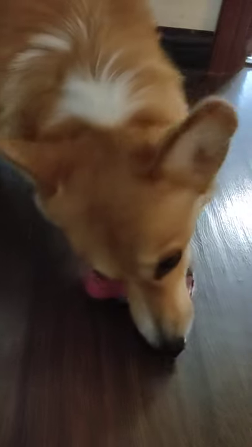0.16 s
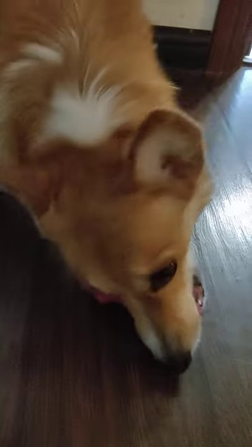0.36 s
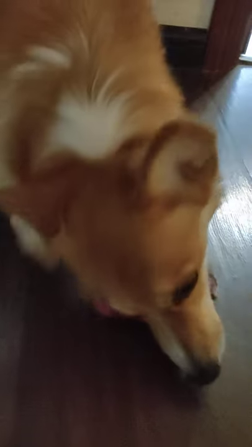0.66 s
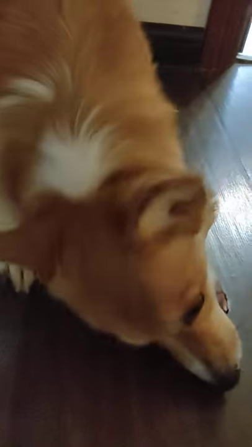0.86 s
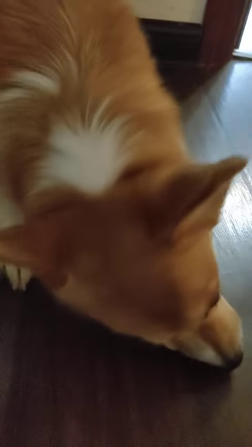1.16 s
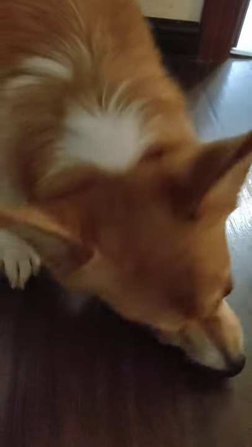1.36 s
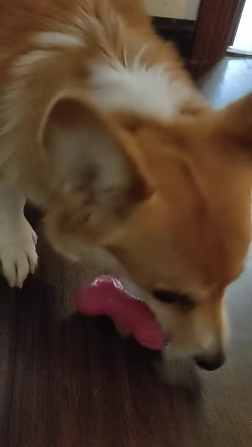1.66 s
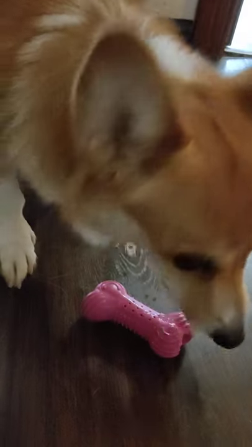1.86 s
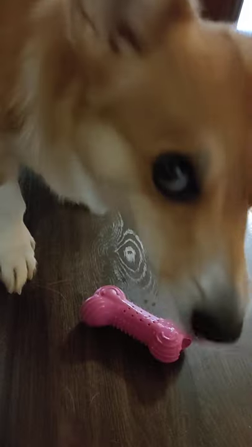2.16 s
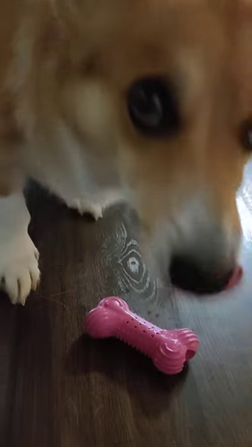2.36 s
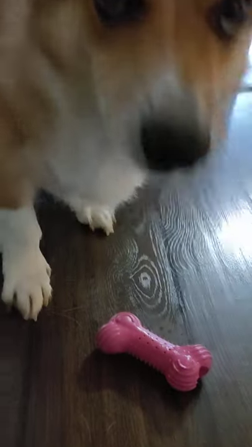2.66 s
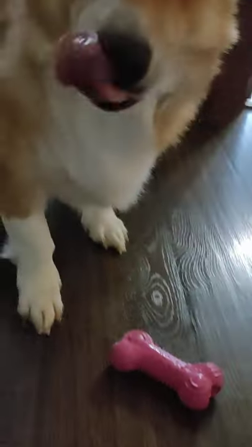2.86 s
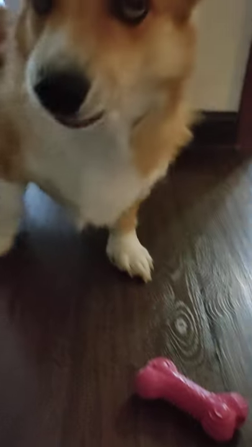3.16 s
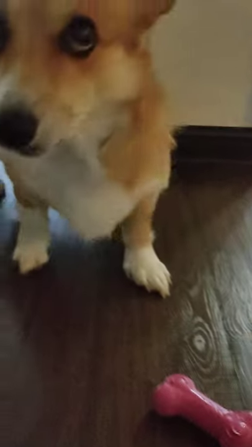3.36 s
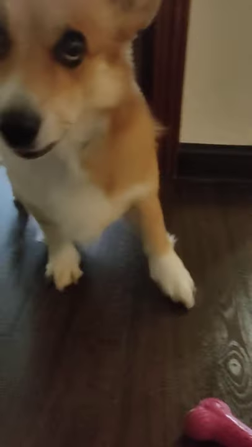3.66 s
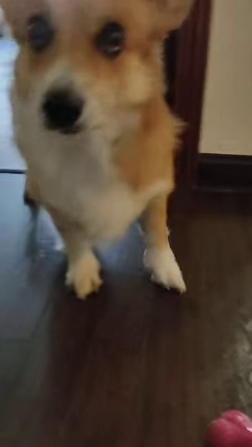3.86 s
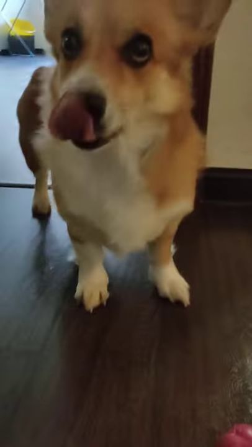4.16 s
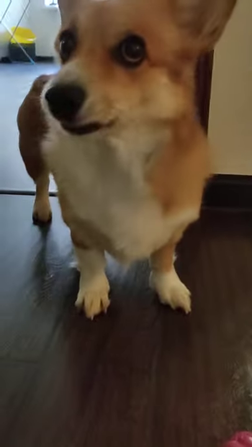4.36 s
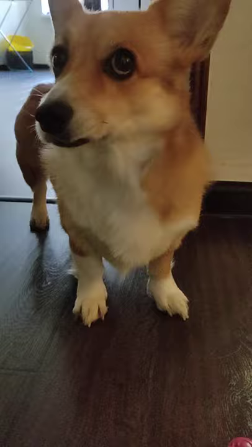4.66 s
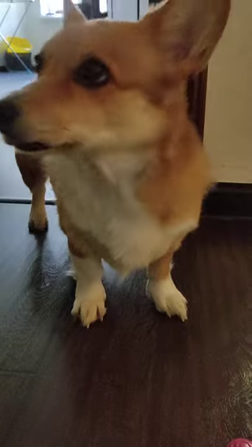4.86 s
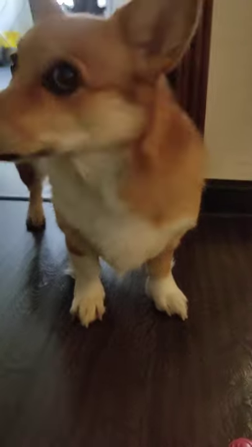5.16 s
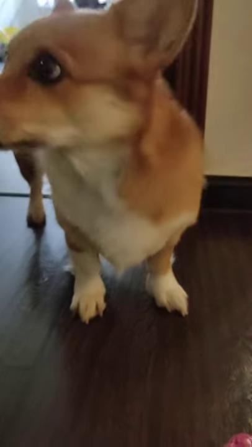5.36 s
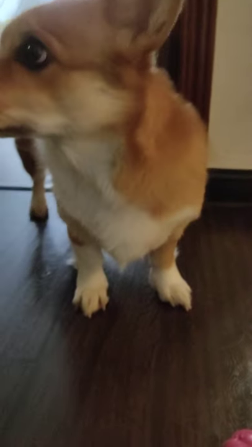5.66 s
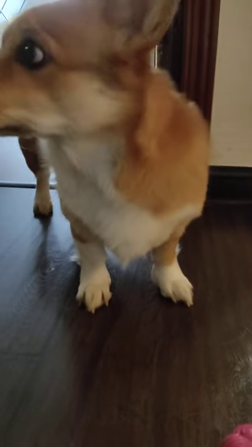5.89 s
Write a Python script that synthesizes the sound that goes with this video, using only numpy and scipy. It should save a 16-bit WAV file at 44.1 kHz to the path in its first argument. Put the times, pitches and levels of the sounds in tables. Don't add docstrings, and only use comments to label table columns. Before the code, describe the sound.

A quiet bare room with a wooden floor, heard close on a phone with faint hiss and a barely audible distant motor whine. From 0 to 0.5 s, soft nose puffs and low rubbing. At 0.6-0.7 s claws tick and scrape, then at about 0.85 s a very loud, hard, bright clatter rings off the walls. A soft huff comes at 1.1 s and a tiny wet smack at 1.4 s. Rubber rubs the boards from 1.5 s, low rumble swells, and the toy thuds at 1.88 s. Light scattered ticks and rustle run from 2.3 to 2.9 s. Scratchy claw steps fall at 3.05, 3.4 and 3.7 s, then a denser scrape and clicks at 3.8-4.03 s. Small wet licks cluster around 4.15 s, with fainter ones to 4.8 s. A soft bump at 5.03 s, then fading rub and near silence to 6 s.

```python
import sys
import numpy as np
from scipy import signal
from scipy.fft import rfft, irfft, next_fast_len
from scipy.io import wavfile
from scipy.ndimage import uniform_filter1d, map_coordinates

SR = 44100
rng = np.random.default_rng(int(sys.argv[2]) if len(sys.argv) > 2 else 0)


def natural_amplitude(level_db):
    exponent = np.asarray(level_db, float) / 20
    return 10 ** exponent


def output_pcm(signal):
    pcm = np.clip(np.atleast_2d(signal).T, -1, 1) * 32767
    wavfile.write(sys.argv[1], SR, np.round(pcm).astype(np.int16))


N = 265923
TIME = np.arange(N) / SR

# frequency in Hz, level in dB.
CLAW_BODY = [(1000, -19), (2200, 5.5), (3300, 11), (4500, 13), (6000, 5.5), (9000, -55.5)]


def unit(x):
    return x / np.sqrt(np.mean(x ** 2) + 1e-20)


def along(points, hz):
    f, v = np.transpose(points)
    return np.interp(np.log(hz + 1), np.log(f + 1), v)


def filtered(x, response):
    size = next_fast_len(N + SR // 2)
    hz = np.fft.rfftfreq(size, 1 / SR)
    return irfft(rfft(x, size) * response(hz), size)[..., :N]


def coloured(points):
    return lambda hz: natural_amplitude(along(points, hz))


def modes(table):
    def response(f):
        total = 0
        for k, (centre, width, db) in enumerate(table):
            damping = 1j * f * width
            total = total + (-1) ** k * natural_amplitude(db) * damping / (centre * centre - f * f + damping)
        return total
    return response


def causal(points):
    cepstrum = irfft(np.log(natural_amplitude(along(points, np.fft.rfftfreq(1024, 1 / SR)))))
    cepstrum[1:512] *= 2
    cepstrum[513:] = 0
    pulse = irfft(np.exp(rfft(cepstrum)))[:512]
    return pulse / np.linalg.norm(pulse)


def paired(response, grain_db=0):
    # frequency in Hz, share from 0 to 1.
    likeness = [(100, .97), (500, 0.65), (1200, 0.02), (3000, 0.2)]
    grit = natural_amplitude(grain_db * unit(uniform_filter1d(rng.standard_normal(N), size=60)))

    def mid_side(hz):
        turn = np.arccos(np.clip(along(likeness, hz), 0, 1)) / 2
        return response(hz) * [np.cos(turn), np.sin(turn)]

    mid, side = filtered(grit * rng.standard_normal((2, N)), mid_side)
    return unit(np.array([mid + side, mid - side]))


def swells(rows, uneven_db, rate):
    start, end, rise, fall, db = np.transpose(rows)[..., None]
    before = np.clip((start - TIME) / np.abs(rise), 0, None)
    after = np.clip((TIME - end) / np.abs(fall), 0, None)
    loss_db = 18.5 * (before + after) ** 1.16
    unsteady = map_coordinates(rng.standard_normal(int(N * rate / SR) + 4), [TIME * rate])
    return np.sqrt(np.sum(natural_amplitude(db - loss_db) ** 2, axis=0)) * natural_amplitude(uneven_db * unsteady)


def quiet():
    # frequency in Hz, level in dB.
    air_spectrum = [(2.9, 6), (5.0, -8), (18, -9), (32, -13), (411, -33.5), (442, -32), (500, -35.5),
                    (566, -36), (1020, -36), (1240, -39), (1800, -48.5), (2340, -66), (3960, -120)]
    # frequency in Hz, rms level in dB.
    motor = [(1136, -90.5), (1233, -84.5), (1281, -87), (1335, -91)]
    noise = rng.standard_normal((2, N))
    air = filtered(noise, lambda hz: natural_amplitude(along(air_spectrum, hz)) * (hz < 2200))
    whine = np.zeros((2, N))
    for (hz, db), phase in zip(motor, rng.uniform(0, 1.5, (len(motor), 2, 1))):
        whine += natural_amplitude(db + 5.5) * np.sin(2 * np.pi * hz * TIME + phase)
    return natural_amplitude(-52.5) * unit(air) * natural_amplitude([[.8], [-.8]]) + whine


def huffs():
    # start in seconds, length in seconds, level in dB.
    puffs = [(0.01, 0.037, -68.5), (0.381, 0.06, -67), (0.459, 0.045, -58.5), (0.641, 0.049, -68),
             (1.088, 0.074, -56), (1.368, 0.059, -69.5), (1.748, 0.13, -67.5), (2.446, 0.11, -70.5),
             (3.037, 0.036, -64), (3.434, 0.13, -72.5), (3.816, 0.046, -65), (4.002, 0.0099, -71.5),
             (4.145, 0.025, -63.5), (4.264, 0.027, -72)]
    # frequency in Hz, level in dB.
    nose = [(200, -3.5), (400, 0.5), (700, 4.5), (1300, 3.5), (1900, -6), (2600, -8.5), (5000, -33)]
    rise_s, fall_s = 0.04, 0.041
    gestures = [(s, s + length, rise_s, fall_s, db) for s, length, db in puffs]
    flow = swells(gestures, uneven_db=3.0, rate=28)
    return flow * paired(coloured(nose), grain_db=-3.0) * natural_amplitude(6.5)


def contacts():
    # time in seconds, peak in dB, claw body in dB,
    # knock in the board in dB, left-right in dB.
    strikes = [(0.582, -32, 0, -26.5, 4), (0.6461, -28, 2, -19, -13.5), (0.6495, -32.5, 0.5, -32, -3),
               (0.652, -32, -2.5, -31, -6.5), (0.666, -25, -21, -48, -21), (0.6688, -43, -8, -40, -0.5),
               (0.6874, -18, -6.5, -46.5, -8), (0.6887, -26, -1, -47.5, -9), (0.8433, -0.5, -17, -33.5, -2),
               (0.8453, -11, -22, -29.5, -7.5), (0.8477, -7.5, -8, -42.5, 13.5),
               (0.848, -21, -16.5, -41, 0), (0.8524, -11, -10.5, -35, -0.5), (0.8507, -7, -15.5, -44, -16),
               (0.8661, -3.5, -10, -30.5, -21), (0.8696, -13.5, -11, -39.5, -20.5),
               (0.8716, -21, -17, -32.5, -10), (1.8796, -24.5, -20, -23, -1), (3.0317, -39, -14.5, -22, 17),
               (3.0362, -29, -11, -23.5, 21), (3.043, -24.5, -27, -30.5, 26), (3.0617, -24, -29, -26, -4),
               (3.3412, -27, 0.5, -20, -23.5), (3.3706, -31.5, 1.5, -7.5, -2), (3.3968, -38, 1.5, -27, 4.5),
               (3.3974, -10, -19, -30.5, -24), (3.399, -17, -1, -22.5, 3), (3.6785, -17.5, -27, -32.5, 0.5),
               (3.9553, -19, -13, -29.5, -12), (3.9602, -15, -6.5, -32, 0), (3.9723, -20.5, -12, -25, 2),
               (3.9859, -7.5, -18.5, -38, -12), (4.0329, -26.5, -1.5, -16, -11)]
    # time in seconds, peak in dB, claw body in dB,
    # left-right in dB.
    ticks = [(0.0363, -46, -8, 27.5), (0.5913, -39, -7, 1), (0.6043, -41.5, -8, 4.5),
             (0.6354, -38, -5, 10.5), (1.64, -50, -33, 31), (2.0353, -44, -11, 19), (2.2573, -45, -25, -5),
             (2.2962, -35, -38, 9), (2.3107, -40, -30, -2.5), (2.4297, -49, -26, 21), (2.438, -34, -28, 5),
             (2.4458, -34, -25, 29), (2.4654, -42, -16, 22), (2.4728, -32, -20, 5), (2.5024, -36, -18, -17),
             (2.5177, -46, -20, -15), (2.5458, -55, -22, 25), (2.5664, -30, -21, 0),
             (2.6003, -39.5, -6, 11.5), (2.7826, -41, -32, 20), (2.8145, -39.5, -26, 13),
             (2.8496, -32.5, -26, -2), (2.965, -33, -21, 13.5), (3.0571, -49, -13.5, 8.5),
             (3.0598, -27, -8, 6), (3.0651, -33, -30, -18), (3.075, -38.5, -18, 20.5),
             (3.1754, -45, -11, -2), (3.214, -39, -18.5, -10), (3.2203, -34, -20, -30),
             (3.4798, -32.5, -24, -18), (3.5043, -30.5, -1.5, 4.5), (3.8048, -36.5, -16, 1),
             (3.8193, -25, -14, 0), (3.847, -38, -8.5, -1), (3.877, -21.5, -16, -16),
             (3.9801, -30.5, -11.5, -7), (4.0169, -35, -16, -15), (4.0044, -41, -18, 0.5),
             (4.136, -25.5, -52, 11), (4.1474, -52, -18, 5), (4.1683, -41, -37, -18.5),
             (4.6212, -43.5, -29, -8.5), (4.7385, -46.5, -4, -10), (4.7722, -34.5, -17, -9),
             (4.9187, -50, -29.5, 23.5)]
    # time in seconds, peak in dB,
    # claw body in dB, knock in the board in dB.
    taps = [(0.6736, -36, -12, -35), (1.4006, -54, 7.5, 1.5), (1.5003, -59, 8, -8),
            (2.1014, -54, -9.5, -6.5), (2.1854, -61.5, 5, -1), (2.4877, -55, 1, -1), (2.4946, -57, 7, -11),
            (2.5115, -56, -11, -8), (2.5244, -52, -18, -4), (3.3601, -45, 16, 1), (3.5544, -35, -5, -19),
            (3.5574, -36, -10, -22), (3.7361, -37.5, -4, -17), (4.2554, -56.5, -21, -18.5),
            (4.2742, -41.5, -22.5, -33), (4.4264, -49.5, -8.5, -19), (4.5644, -52.5, -21, -14),
            (5.0266, -46.5, -18, -16)]
    strike_ms, tick_ms, tap_ms = 12, 9, 9
    tick_knock_db, tap_pan_db = -30.5, 5
    rows = [(*row, strike_ms) for row in strikes]
    rows += [(s, db, body, tick_knock_db, pan, tick_ms) for s, db, body, pan in ticks]
    rows += [(*row, tap_pan_db, tap_ms) for row in taps]
    return rows


def claws():
    # frequency in Hz, level in dB.
    tip = [(3000, -37), (6000, 8.5), (9000, 5.5), (12500, -3.5), (14500, -12)]
    knock = [(250, -33), (600, -0.5), (1200, -7), (2000, -0.5), (4000, -25.5)]
    crack = [12, 7, 7]
    linger = [1, 1.9, 1.6]
    # delay in ms, level in dB.
    walls = [(14.4, -25.5), (18.6, -26.5), (20.6, -27.5)]
    rows = contacts()
    layers = np.zeros((3, 2, N + 1500))
    t = np.arange(1500) / SR
    chance = rng.standard_normal((len(rows), 3, 1500))
    for (s, db, body_db, knock_db, pan_db, ms), (both, left, right) in zip(rows, chance):
        decay_s = ms * np.reshape(linger, (3, 1, 1)) / 1000
        fall = natural_amplitude(-60 * t / decay_s) + .04 * natural_amplitude(-60 * t / .03)
        burst = (both + 2.0 * np.array([left, right])) * fall
        burst[..., 0] = np.reshape(crack, (3, 1))
        burst *= 4 / np.linalg.norm(burst, axis=(1, 2), keepdims=True)
        side = natural_amplitude(pan_db * np.outer([.25, .08, .05], [1, -1]))[..., None]
        level = natural_amplitude(db + np.array([-9, body_db + 2.5, knock_db + 13.5]))[:, None, None]
        at = round((s + .0004) * SR)
        layers[:, :, at:at + 1500] += level * side * burst
    shapes = np.array([causal(tip), causal(CLAW_BODY), causal(knock)])[:, None]
    left, right = signal.fftconvolve(layers, shapes, axes=2).sum(0)[:, :N]
    direct = np.array([left, np.roll(right, shift=15)])
    heard = direct.copy()
    for k, (ms, db) in enumerate(walls):
        facing = direct[::(-1) ** k]
        heard += natural_amplitude(db) * np.roll(facing, round(ms * SR / 1000), axis=1)
    return heard


def dragging():
    # peak in seconds, rise in seconds, fall in seconds, joist rumble in dB,
    # board rub in dB.
    drags = [(0.25, 0.41, 0.52, -61, -64), (0.5, 0.12, 0.45, -66, -72), (0.85, 0.13, 0.29, -56.5, -60.5),
             (1.1, 0.34, 0.73, -68.5, -80), (1.43, 0.029, 0.13, -53, -79), (1.545, 0.011, 0.23, -61, -46.5),
             (1.66, 0.18, 0.2, -48, -74), (1.791, 0.42, 0.13, -42, -56), (1.95, 0.2, 0.3, -45.5, -55),
             (2.299, 0.12, 0.06, -55, -71), (2.45, 0.065, 0.36, -55.5, -60), (2.64, 0.2, 0.35, -51, -67.5),
             (2.93, 0.63, 0.25, -59, -72), (3.22, 0.2, 0.49, -55, -61.5), (3.71, 0.045, 1, -60.5, -70),
             (4.26, 0.11, 0.077, -78.5, -66.5), (4.43, 0.028, 0.07, -59.5, -62.5),
             (4.54, 0.087, .06, -57.5, -70), (4.75, 0.27, 0.55, -65, -70), (5.07, .04, 0.26, -58.5, -67),
             (5.3, 0.11, 0.55, -62.5, -72.5)]
    # frequency in Hz, width in Hz, level in dB.
    hollow = [(75, 27, -2.5), (134.5, 21, 0), (164.7, 24, -6.5)]
    rubbed = [(223, 47, 3.5), (325, 53, 1.5), (405, 39, -4.5)]
    rumble_rows = [(s, s, up, down, db) for s, up, down, db, _ in drags]
    rub_rows = [(s, s, up, down, db) for s, up, down, _, db in drags]
    rumble = swells(rumble_rows, uneven_db=1.5, rate=5.5) * paired(modes(hollow), grain_db=2.0)
    rub = swells(rub_rows, uneven_db=3.0, rate=25) * paired(modes(rubbed), grain_db=4.0)
    return rumble * natural_amplitude(-3.5) + rub * natural_amplitude(-1.1)


def sliding():
    # peak in seconds, rise in seconds, fall in seconds, rustle in dB,
    # claw drag in dB.
    slides = [(0.27, .2, 0.095, -62.5, -74), (0.5, 0.17, 0.19, -62, -66), (0.6, .015, 0.069, -51, -52),
              (0.681, 0.1, 0.021, -46.5, -47), (0.81, 0.12, .05, -73.5, -79.5),
              (1.339, 0.064, 0.061, -59.5, -81), (1.65, 0.14, 0.33, -62, -93),
              (2.297, 0.13, 0.4, -62, -73.5), (2.446, 0.012, 0.038, -49, -57),
              (2.475, 0.04, 0.067, -50.5, -58), (2.51, 0.05, 0.19, -57, -71),
              (3.039, 0.015, 0.052, -45, -50), (3.066, 0.049, 0.021, -35.5, -38.5),
              (3.2, 0.16, .04, -60, -73), (3.425, 0.023, 0.065, -70, -49), (3.46, 0.015, 0.078, -46, -46),
              (3.665, 0.16, 0.037, -55.5, -67), (3.73, 0.12, 0.16, -54, -58.5),
              (3.806, 0.008, 0.16, -54, -56), (3.821, 0.016, 0.064, -41.5, -55),
              (3.84, .04, 0.069, -52, -42), (3.855, 0.053, 0.038, -35.5, -43),
              (3.874, 0.05, 0.027, -40, -42.5), (3.945, .12, 0.041, -48, -49),
              (4.0, .02, 0.055, -61, -53.5), (4.155, 0.029, 0.031, -49.5, -76),
              (4.29, 0.055, 0.22, -58, -75), (5.114, .08, 0.046, -64.5, -73)]
    # frequency in Hz, level in dB.
    fur = [(4000, -31.5), (7000, 4), (9500, -1), (12000, -3.5), (14500, -4)]
    rustle_rows = [(s, s, up, down, db) for s, up, down, db, _ in slides]
    scrape_rows = [(s, s, up, down, db) for s, up, down, _, db in slides]
    rustle = swells(rustle_rows, uneven_db=1.8, rate=29) * paired(coloured(fur), grain_db=3.0)
    scrape = swells(scrape_rows, uneven_db=2.2, rate=60) * paired(coloured(CLAW_BODY), grain_db=4.5)
    return rustle * natural_amplitude(-7) + scrape * natural_amplitude(-1.5)


def smacks():
    # time in seconds, peak in
    # dB, frequency in Hz, t60 in ms.
    licks = [(1.4006, -38.5, 2940, 10.6), (1.415, -55, 2800, 16), (2.102, -54, 2320, 9.3),
             (2.5245, -44, 885, 8.6), (4.114, -58, 820, 22), (4.134, -48.5, 810, 25),
             (4.146, -46.5, 1440, 25), (4.166, -45.5, 810, 15), (4.168, -50.5, 1250, 28),
             (4.18, -62, 800, 16), (4.255, -50, 780, 24), (4.275, -51, 750, 19), (4.426, -58.5, 843, 17),
             (4.739, -59, 2330, 7.2), (4.774, -52, 2620, 11)]
    glide, rise_s = 6.5, 0.00021
    out = np.zeros((2, N + 1500))
    t = np.arange(1500) / SR
    for (s, db, hz, ms), turn in zip(licks, rng.standard_normal((len(licks), 2, 1))):
        shape = natural_amplitude(db - 60 * t / (abs(ms) / 1000)) * (1 - np.exp(-t / rise_s))
        tone = np.sin(2 * np.pi * hz * t * (1 + glide * t) + 1.06 * turn)
        out[:, round(s * SR):][:, :1500] += 1.67 * shape * tone
    return out[:, :N]


def thuds():
    # time in seconds, peak in dB, softness in ms.
    blows = [
        (1.538, -47.5, 0.44),
        (1.8787, -17.5, 0.62),
        (4.424, -56.5, 0.27),
        (5.0258, -45.5, 1.44),
    ]
    # frequency in Hz, width in Hz, level in dB.
    board = [(263, 34, 3.5), (151, 42, -10), (454, 20, 5.5), (696, 370, -6)]
    push = np.zeros(N)
    for s, db, ms in blows:
        u = (np.arange(220) - 110) / (ms * SR / 1000)
        push[round(s * SR):][:220] += natural_amplitude(db) * (1 - u * u) * np.exp(-u * u / 2)
    ring = .45 * filtered(push, modes(board))
    return (1.25 * push + ring) * natural_amplitude([[1.2], [-1.2]])


def room(x):
    # frequency in Hz, t60 in seconds.
    decay = [(150, 0.33), (500, 0.46), (2000, 1), (5000, 0.7), (9000, 0.51), (12500, 0.27), (14500, 0.25)]
    wet, step = np.zeros((2, N + 2 * SR)), SR // 4
    delay = round(.0125 * SR)
    for at in range(0, N, step):
        hz, t, z = signal.stft(rng.standard_normal((2, SR * 3 // 5)), SR, nperseg=256)
        fading = z * natural_amplitude(-60 * t / along(decay, hz)[:, None])
        tail = signal.istft(fading, SR, nperseg=256)[1]
        tail[1] = signal.lfilter([.07], [1, -.93], tail[0] - tail[1]) + tail[1]
        part = signal.fftconvolve(x[:, at:at + step], tail / np.linalg.norm(tail[0]), axes=1)
        wet[:, at + delay:][:, :part.shape[1]] += part
    return wet[:, :N]


def scene():
    background = quiet()
    ticks, blows, mouth = claws(), thuds(), smacks()
    moves = huffs() + dragging() + sliding()
    sent = natural_amplitude(-13.0) * mouth + natural_amplitude(-10.5) * ticks + natural_amplitude(-8.5) * blows + natural_amplitude(-11.0) * moves
    return ticks + blows + moves + mouth + room(sent) + background


def roll_off(x):
    return signal.sosfilt(signal.butter(12, 16430, fs=SR, output="sos"), x)


def record(dry):
    # frequency in Hz, width in Hz, level in dB.
    port_modes = [(11470, 915, 21.3), (9115, 790, 13.7)]
    # frequency in Hz, level in dB.
    hiss_spectrum = [(300, -18.5), (1500, 5), (4000, 3), (8000, 1.5), (12500, 2.5), (14500, 3)]
    band_limit = [(13800, 0), (14300, -4), (14600, -22), (16000, -27), (16450, -60), (16600, -120)]

    def ports(hz):
        return np.array([1 + modes([port])(hz) for port in port_modes])

    hiss = natural_amplitude(-66.5) * unit(filtered(rng.standard_normal((2, N)), coloured(hiss_spectrum)))
    heard = filtered(dry, ports) + filtered(hiss, lambda hz: 1 + 0.1 * (ports(hz) - 1))
    heard = heard / (1 + np.abs(heard / .85) ** 4) ** .25
    heard = filtered(heard, coloured(band_limit))
    return roll_off(heard)


dry = scene()
out = record(dry)
output_pcm(out)
```